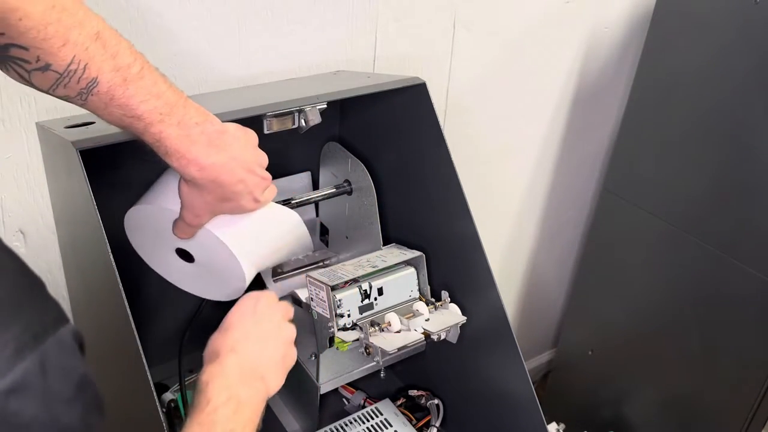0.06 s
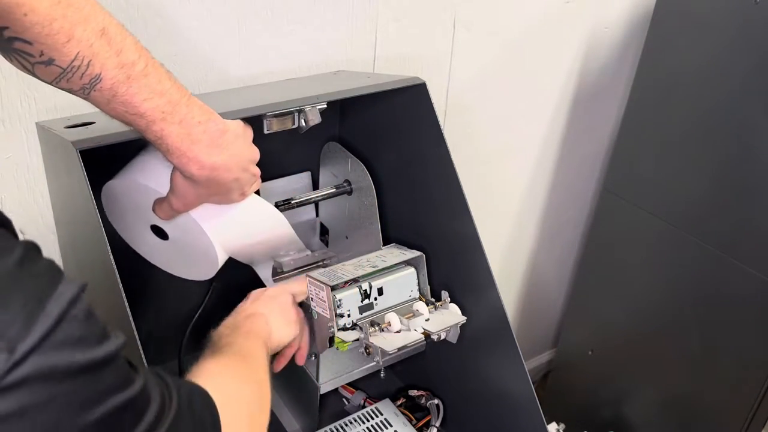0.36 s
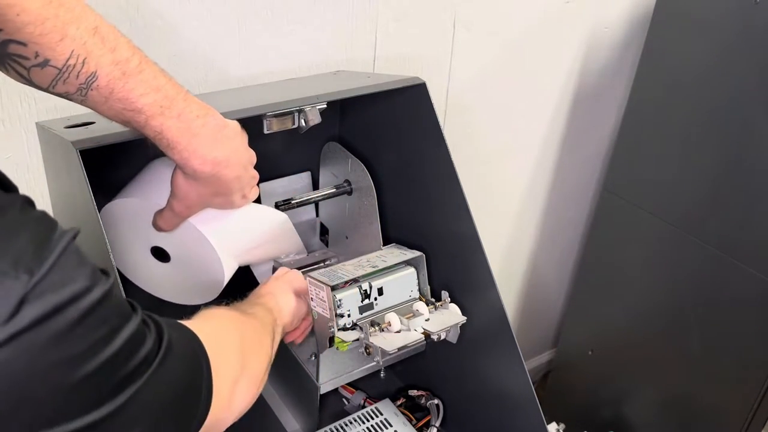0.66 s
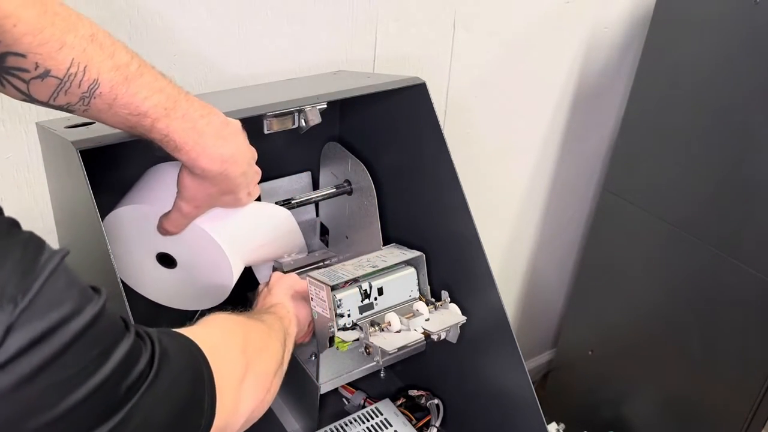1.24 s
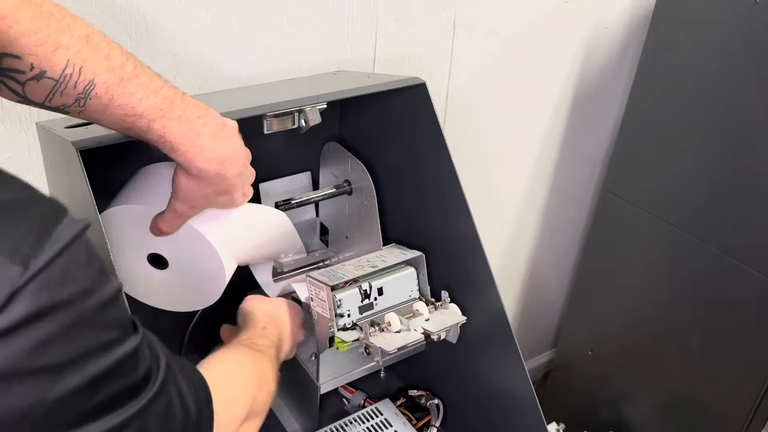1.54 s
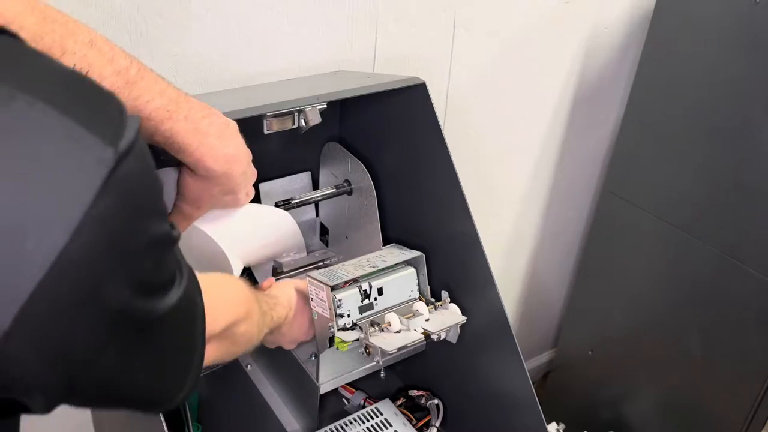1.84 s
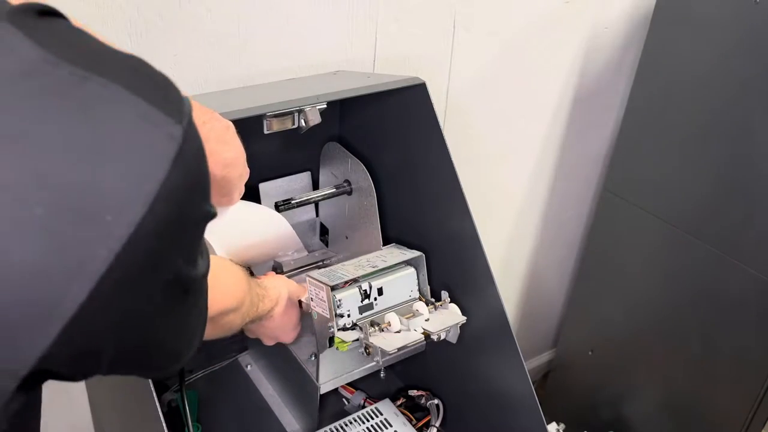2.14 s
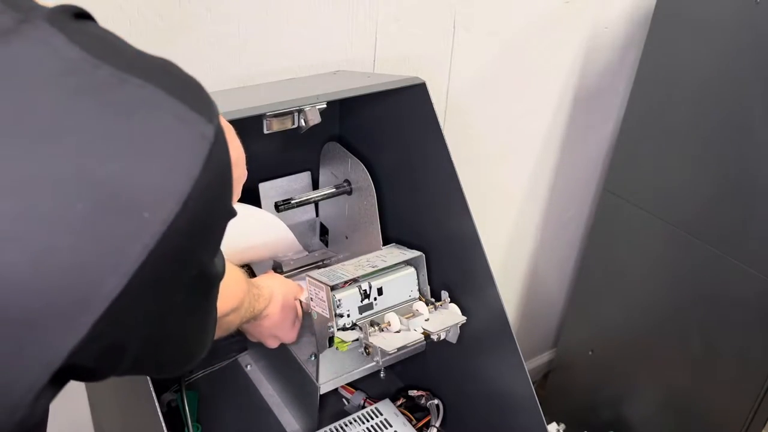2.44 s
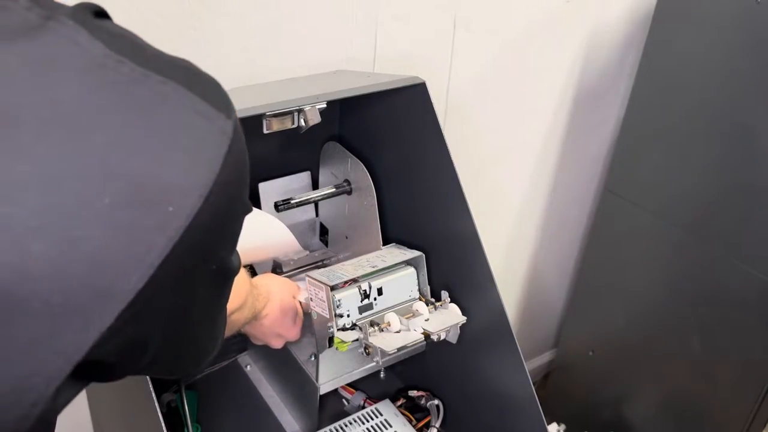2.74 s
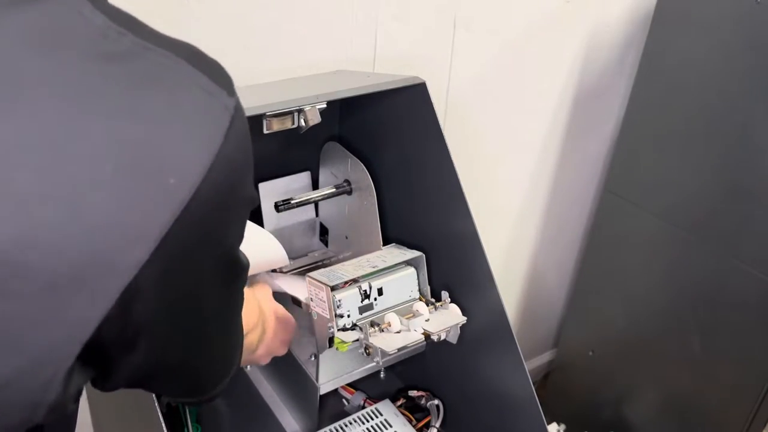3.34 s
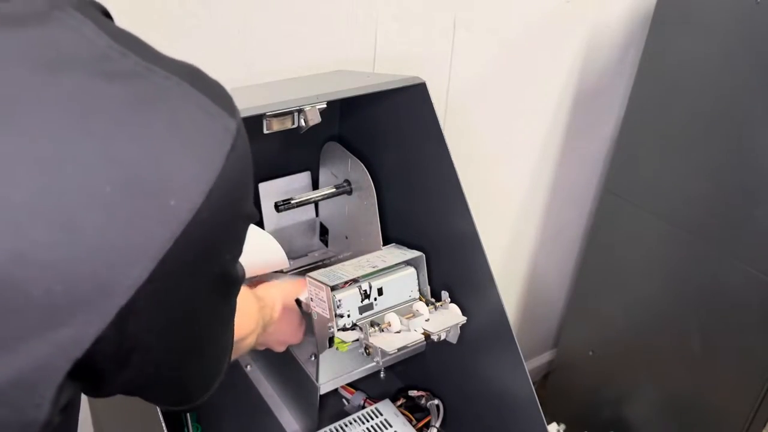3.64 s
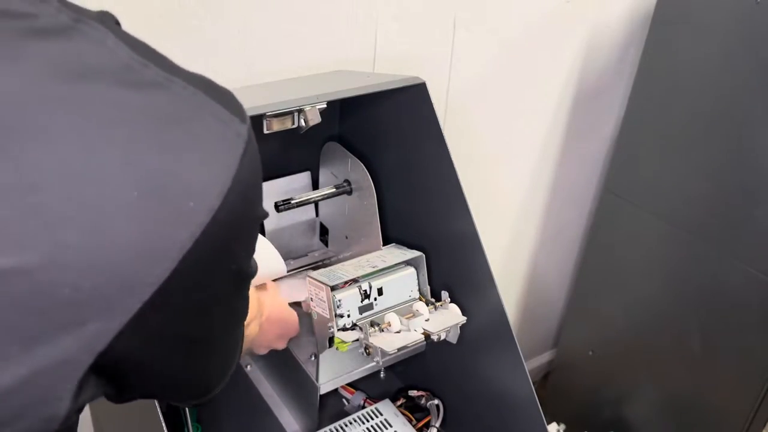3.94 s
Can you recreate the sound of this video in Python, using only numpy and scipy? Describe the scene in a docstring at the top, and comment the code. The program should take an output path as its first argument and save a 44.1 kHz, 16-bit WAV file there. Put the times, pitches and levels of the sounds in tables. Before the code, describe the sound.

Paper slides and crackles in short strokes as a roll is loaded by hand into a receipt printer. Dull knocks and a brief rattle ring the steel cabinet, then the mechanism snaps several times, close by in a quiet room.

```python
"""Loading a receipt printer.

A paper roll goes by hand into a sheet-steel kiosk in a quiet room. The feed mechanism snaps;
the paper slides and crackles in short strokes. Hand and roll bump the housing, handling adds light
ticks and dull taps, and the frame rings with each contact. A knocked bracket chatters, flexing
panels boom faintly, and ventilation rumbles behind it all."""
import sys
import numpy as np
from scipy import signal
from scipy.fft import rfft, irfft, next_fast_len
from scipy.io import wavfile

SR = 44100
rng = np.random.default_rng(int(sys.argv[2]) if len(sys.argv) > 2 else 0)


def waveform_to_disk(signal):
    """Save audio, clipped to [-1, 1], as 16-bit WAV at the path in sys.argv[1]."""
    frames = np.transpose(np.atleast_2d(signal))
    scaled = np.clip(frames, -1, 1) * 32767
    samples = np.round(scaled).astype(np.int16)
    wavfile.write(sys.argv[1], SR, samples)


N = 176400
TIME_S = np.arange(N) / SR

# Feed snaps. Each row: start in seconds, level in dB, body, middle and top shading in dB,
# crack T60 in seconds, pitch of the struck part in Hz, its level in dB.
FEED_SNAPS = [(2.4600, -36, -14, -5, 0, 0.076, 990, -29), (2.817, -39.5, -20, -7.5, -10.5, 0.09, 5100, -40),
              (2.8626, -28.7, -7, -0.5, -0.5, 0.085, 164, -39.5),
              (3.101, -32.5, -10, -10.5, -4, 0.12, 4370, -42),
              (3.1313, -36.5, -14, -9, -9, 0.094, 5700, -24),
              (3.8664, -26, -25.5, -13, 1.5, 0.046, 8820, -8)]
# Paper slides. Each row: peak time, rise and fall in seconds, level in dB, tilt in dB per octave.
PAPER_STROKES = [(.08, 0.42, 0.065, -66, -0.5), (.42, 0.032, 0.11, -58, 1), (.98, 0.11, 0.057, -67, -0.5),
                 (1.332, 0.028, 0.041, -51.5, 2), (1.47, 0.03, 0.027, -56, 1.5),
                 (1.82, 0.095, 0.18, -64.5, 3.5), (2.02, 0.07, 0.082, -61.5, 2),
                 (2.9, 0.023, 0.024, -36.5, 1.5), (2.97, 0.11, 0.11, -50, 2),
                 (3.258, 0.12, 0.14, -61.5, 2.5), (3.735, 0.027, 0.05, -46, -2.5),
                 (3.847, 0.022, 0.044, -46, 4), (3.895, 0.022, 0.012, -36.5, 2),
                 (3.97, 0.052, .15, -42.5, 3)]
# Housing knocks. Each row: start in seconds, level in dB, treble in dB, crack T60 in seconds.
HOUSING_BUMPS = [(0.467, -40, -7, 0.22), (0.502, -40.5, 1.5, 0.14), (0.541, -49, -5, 0.17),
                 (.8670, -52, 0, 0.06), (1.3069, -44, 1, 0.067), (1.322, -52, 21.5, 0.094),
                 (1.918, -59, 16, 0.064), (1.981, -57.5, 19, 0.056)]
# Light handling ticks and dull taps. Each row: start in seconds, level in dB, treble in dB.
HANDLING_TICKS = [(.094, -59.5, -44), (1.397, -57, 5.5), (2.048, -55, -18), (2.7691, -47, -20.5),
                  (3.003, -44.5, -27), (3.042, -49, -21), (3.685, -57, 1.5), (3.7062, -43, -4.5),
                  (3.722, -41.5, -12.5), (3.969, -42.5, -8)]
# Panel flexes. Each row: start in seconds, level in dB, swell in seconds.
PANEL_BOOMS = [(0.421, -42.5, 0.017), (1.337, -39, 0.04), (2.323, -38, 0.031), (2.924, -31, 0.048),
               (3.2, -41, 0.08)]
# Frame resonances. Each row: frequency in Hz, relative level in dB, T60 in seconds.
FRAME_MODES = [(156.6, -3, 0.95), (178, -4.5, 0.97), (228, -6, 0.99), (276.3, -7.5, 0.99), (388, -3, 0.17),
               (432, 0.5, 0.25), (975, -13, 0.33), (1746, -8, 0.13), (2040, -5, 0.11), (3070, -10.5, 0.081)]
# Bracket resonances. Each row: frequency in Hz, level in dB.
BRACKET_MODES = [(231, -37.5), (580.6, -33.5), (705, -44), (1437, -46), (1700, -49), (1879, -49),
                 (2439, -52), (2815, -46), (3025, -48.5), (3892, -51)]
# Source spectra. Each row: frequency in Hz, band level in dB.
SNAP_SPECTRUM = [(90, 0.5), (190, -5), (420, 1), (560, -2), (950, 5), (1300, 5), (2000, 1.5), (4200, 4.5),
                 (7000, 1.5), (9100, 4), (10800, -3.5), (13000, -3)]
PAPER_SPECTRUM = [(150, -33), (500, -14), (1200, -3.5), (3500, -4), (7000, -6), (9600, -3.5),
                  (10600, -11.5), (13000, -14.5)]
BUMP_SPECTRUM = [(70, -2), (160, -5), (240, -12), (390, -1), (600, -6.5), (900, -1), (1500, -7.5),
                 (3000, -11), (6000, -24), (15000, -27)]
TICK_SPECTRUM = [(150, -18.5), (600, -7), (1000, -3.5), (2500, 7), (5000, 3.5), (9300, 5), (11000, -10)]
VENT_SPECTRUM = [(25, -71), (50, -65.5), (85, -50), (125, -65.5), (400, -61.5), (700, -70.5), (4000, -73.5),
                 (15000, -80)]
# Room tail strength. Each row: frequency in Hz, gain in dB.
ROOM_SEND_DB = [(100, -15.5), (400, -5), (1200, -12), (5500, -11), (12000, -9.5)]
# Room decay. Each row: frequency in Hz, T60 in seconds.
ROOM_T60_S = [(100, 1), (600, 0.34), (6000, 0.23), (15000, 0.15)]
# Likeness of the ears. Each row: frequency in Hz, correlation from 0 to 1.
EAR_CORRELATION = [(80, 0.98), (160, 0.83), (700, 0.14), (2000, 0.1)]
# Balance. Each row: frequency in Hz, left minus right in dB.
BALANCE_DB = [(160, 1.5), (500, 3.5), (2000, 0), (4000, 1.5), (9000, 2.5), (14000, -1)]

BAND_EDGES_HZ = np.r_[22 * 2 ** np.arange(0, 8, .5), np.geomspace(5632, 16500, 7)]
BAND_HZ = np.sqrt(BAND_EDGES_HZ[1:] * BAND_EDGES_HZ[:-1])
BODY_HZ, MIDDLE_HZ, TREBLE_HZ, TOP_HZ = 330, 1330, 4580, 13200
RIGHT_LAG_SAMPLES = 4


def feed_snaps(bands):
    """The feed mechanism snaps; each snap rings one struck part."""
    out = 0
    for start_s, db, body_db, middle_db, top_db, t60_s, *part in FEED_SNAPS:
        shading = [(BODY_HZ, body_db), (MIDDLE_HZ, middle_db), (TREBLE_HZ, 0), (TOP_HZ, top_db)]
        out += contact(bands, start_s, db, SNAP_SPECTRUM, shading, t60_s, part)
    return out


def paper_slide(bands, slips_per_s=300, slip_s=0.0047, slip_share=0.48):
    """Friction hiss swells and fades with each stroke, broken into tiny slips."""
    slips = (rng.random(N) < slips_per_s / SR) * rng.exponential(1, N)
    crackle = signal.lfilter([1], [1, -np.exp(-1 / (slip_s * SR))], slips + 1e-18)
    octaves = np.log2(np.maximum(BAND_HZ, MIDDLE_HZ) / TREBLE_HZ)
    band_power = 0
    for peak_s, rise_s, fall_s, db, tilt_db in PAPER_STROKES:
        width_s = np.where(TIME_S < peak_s, rise_s, fall_s)
        swell = np.exp(-((TIME_S - peak_s) / width_s) ** 2)
        gains = from_db(db + at_hz(PAPER_SPECTRUM, BAND_HZ) + tilt_db * octaves)
        band_power += np.outer(gains ** 2, swell)
    hiss = np.einsum("bt,bct->ct", np.sqrt(band_power), bands)
    return hiss * np.sqrt(1 - slip_share + slip_share * crackle / crackle.mean())


def housing_bumps(bands):
    """Hand and roll knock dully on the housing."""
    out = 0
    for start_s, db, treble_db, t60_s in HOUSING_BUMPS:
        shading = [(BODY_HZ, 0), (MIDDLE_HZ, treble_db / 2), (TREBLE_HZ, treble_db)]
        out += contact(bands, start_s, db, BUMP_SPECTRUM, shading, t60_s)
    return out


def handling_ticks(bands, t60_s=0.078):
    """Light handling ticks and dull taps."""
    return sum(contact(bands, start_s, db, TICK_SPECTRUM, [(MIDDLE_HZ, 0), (TOP_HZ, treble_db)], t60_s)
               for start_s, db, treble_db in HANDLING_TICKS)


def bracket_ring(start_s=1.3085, swell_s=0.0038, free_s=0.15, chatter_per_s=108, chatter_db=2):
    """A knocked hollow bracket, to the left, chatters in its seat until the hand damps it."""
    t = np.maximum(TIME_S - start_s, 0)
    knots_s = np.arange(0, TIME_S[-1], 1 / chatter_per_s)
    modes = 0
    for hz, db in BRACKET_MODES:
        mode = ring(t, hz, db, t60_s=0.28)
        chatter = np.interp(t, knots_s, rng.standard_normal(len(knots_s)))
        modes += mode * from_db(chatter_db * chatter)
    swell = 1 - np.exp(-t / swell_s)
    hand_damping = decay(np.maximum(t - free_s, 0), t60_s=0.078)
    return modes * swell * hand_damping * pan(left_db=2)


def panel_booms(mode_hz=88.14, octave_db=-10):
    """A pushed panel swells and dies on its lowest mode and the octave above."""
    out = 0
    for start_s, db, swell_s in PANEL_BOOMS:
        t = np.maximum(TIME_S - start_s, 0)
        envelope = t / swell_s * np.exp(1 - t / swell_s)
        phase = 2 * np.pi * mode_hz * t
        octave = from_db(octave_db) * np.sin(2 * phase + rng.uniform(0, 2 * np.pi))
        out += from_db(db) * envelope * (np.sin(phase) + octave)
    return out * pan(at_hz(BALANCE_DB, mode_hz))


def ventilation(bands, hum_hz=116.8, hum_db=-57):
    """Steady low rumble with a faint mains hum."""
    rumble = np.tensordot(from_db(at_hz(VENT_SPECTRUM, BAND_HZ)), bands, 1)
    return rumble + from_db(hum_db) * np.sin(2 * np.pi * hum_hz * TIME_S)


def contact(bands, start_s, db, spectrum, shading, t60_s, part=None):
    """One impact: direct click, crack of dense short modes, room tail, ring of frame and any part."""
    attack_s, room_build_s, damped_above_hz = 0.0016, 0.011, 6900
    build_cycles, part_t60_cycles = 3.4, 94
    start = int(start_s * SR)
    length = min(N - start, SR * 2 // 3)
    t, hz = TIME_S[:length], BAND_HZ[:, None]

    def level_db(at):
        return db + at_hz(spectrum, at) + at_hz(shading, at)

    onset = from_db(level_db(hz)) * (1 - np.exp(-t * hz / build_cycles))  # lows arrive late
    crack = decay(t, t60_s * np.minimum(damped_above_hz / hz, 1))
    tail = from_db(at_hz(ROOM_SEND_DB, hz)) * decay(t, at_hz(ROOM_T60_S, hz))
    tail *= 1 - np.exp(-t / room_build_s)
    sound = np.einsum("bt,bct->ct", onset * np.hypot(crack, tail), bands[:, :, start:start + length])
    click_noise = bands[:, 0, start // 2:start // 2 + length]  # same for both ears
    click = (onset * click_noise).sum(axis=0) * from_db(3.5) * decay(t, t60_s=0.027)
    sound += [click, np.roll(click, RIGHT_LAG_SAMPLES)]
    for mode_hz, mode_db, mode_t60_s in FRAME_MODES:
        sound += ring(t, mode_hz, level_db(mode_hz) + mode_db + rng.normal(0, 2), mode_t60_s)
    if part:
        part_hz, part_db = part
        sound += ring(t, part_hz, part_db, part_t60_cycles / part_hz)
    sound *= np.minimum(t / attack_s, 1)
    return np.pad(sound, ((0, 0), (start, N - start - length)))


def ring(t, hz, db, t60_s):
    """One decaying mode; higher modes differ more in phase between the ears."""
    phase = rng.uniform(0, 2 * np.pi) + rng.standard_normal((2, 1)) * (1 - at_hz(EAR_CORRELATION, hz))
    gains = pan(at_hz(BALANCE_DB, hz)) * from_db(db)
    return gains * decay(t, t60_s) * np.sin(2 * np.pi * hz * t + phase)


def cabinet_resonance(white, ripple_db=2.5, ripple_step_hz=60, boost_db=5, half_width_hz=6.5):
    """Colours noise with the frame's modes and the close, uneven peaks of a steel box."""
    size = next_fast_len(white.shape[-1])
    hz = np.arange(size // 2 + 1) * SR / size
    knots_hz = np.arange(0, SR / 2, ripple_step_hz)
    ripple = np.interp(hz, knots_hz, rng.standard_normal(len(knots_hz))) * np.minimum(hz / MIDDLE_HZ, 1)
    peaks = sum(1 / (1 + ((hz - mode_hz) / half_width_hz) ** 2)
                for mode_hz, _, _ in FRAME_MODES if mode_hz > BODY_HZ)
    return irfft(rfft(white, size) * from_db(ripple_db * ripple + boost_db * peaks), size)


def noise_bands():
    """Cabinet-coloured pink noise, left ear leading; shape is bands x 2 x N."""
    noise = cabinet_resonance(rng.standard_normal((2, 2, N + SR // 4)))
    bands = []
    for k, hz in enumerate(BAND_HZ):
        low_hz, high_hz = BAND_EDGES_HZ[k:k + 2]
        bandpass = signal.butter(2, [low_hz, high_hz], "band", fs=SR, output="sos")
        pair = signal.sosfilt(bandpass, noise[k % 2])[:, -N:]
        mid, side = pair / pair.std() * np.sqrt(np.log2(high_hz / low_hz))
        correlation = at_hz(EAR_CORRELATION, hz)
        mid, side = mid * np.sqrt(1 + correlation), side * np.sqrt(1 - correlation)
        bands.append(pan(at_hz(BALANCE_DB, hz)) * [mid + side, np.roll(mid - side, RIGHT_LAG_SAMPLES)])
    return np.array(bands)


def from_db(db):
    """Decibels to gain."""
    return 10 ** (np.asarray(db) / 20)


def at_hz(table, hz):
    """Table lookup on a log-frequency axis."""
    knots_hz, values = np.transpose(table)
    return np.interp(np.log(hz), np.log(knots_hz), values)


def decay(t, t60_s):
    """Exponential fall, 60 dB in t60_s."""
    return np.exp(-np.log(1000) * t / t60_s)


def pan(left_db):
    """Left and right gains for a level difference."""
    return from_db(left_db * np.array([[.5], [-.5]]))


def scene():
    """Sum of all sources; each noisy one gets its own time shift of the bands."""
    bands = noise_bands()
    mix = panel_booms() + bracket_ring()
    sources = (ventilation, paper_slide, feed_snaps, housing_bumps, handling_ticks)
    for k, source in enumerate(sources):
        mix += source(np.roll(bands, k * N // len(sources), axis=2))
    return mix


def record(dry):
    """Steep low-pass at 16 kHz."""
    return signal.sosfilt(signal.ellip(10, .1, 80, 16000, fs=SR, output="sos"), dry)


dry = scene()
out = record(dry)
waveform_to_disk(out)
```